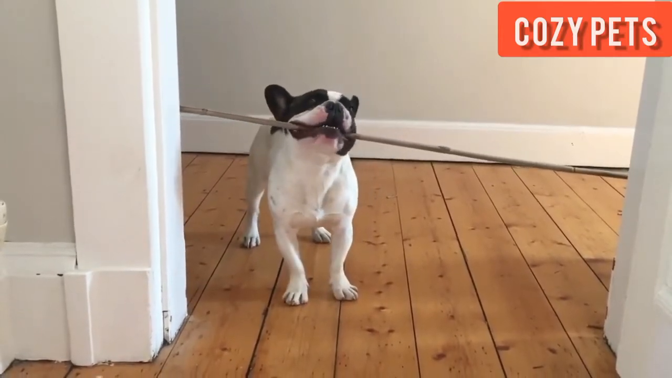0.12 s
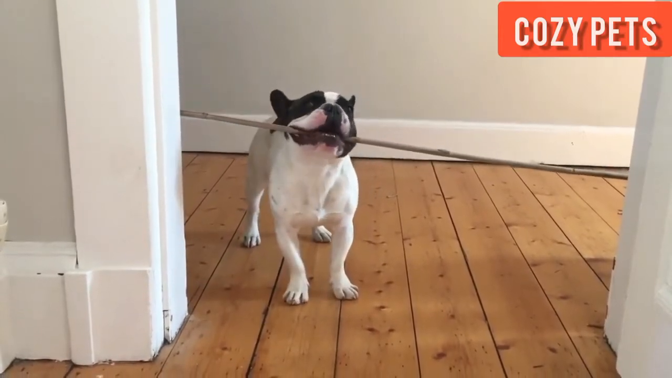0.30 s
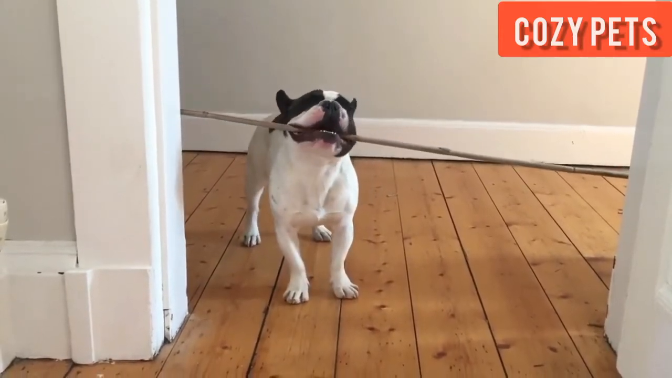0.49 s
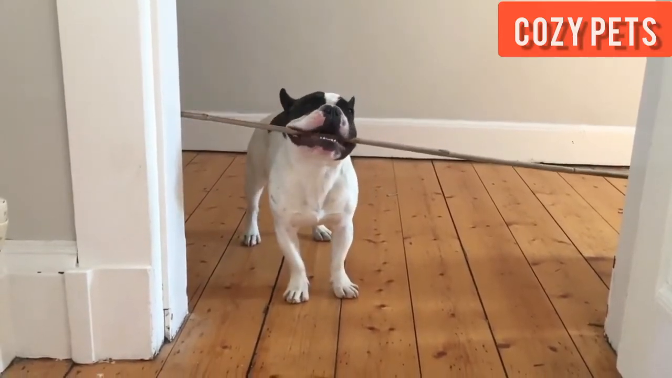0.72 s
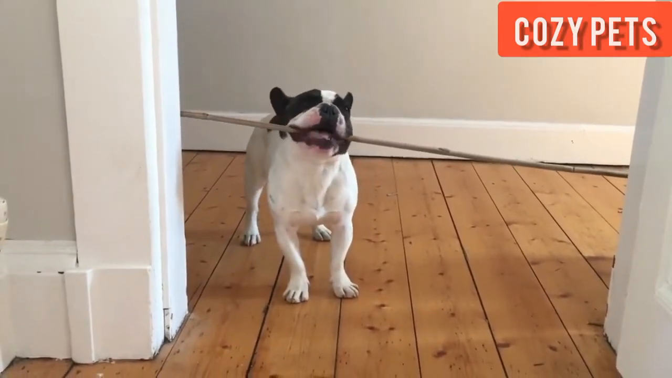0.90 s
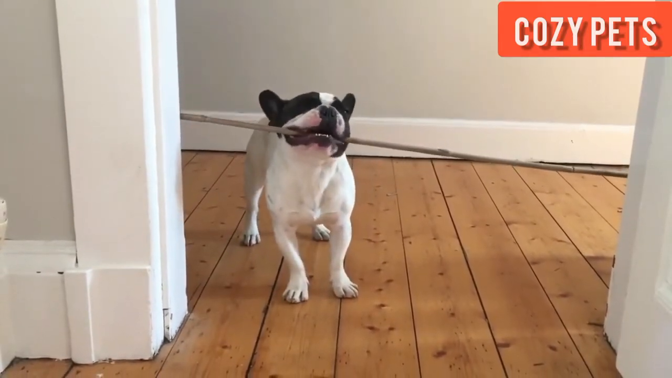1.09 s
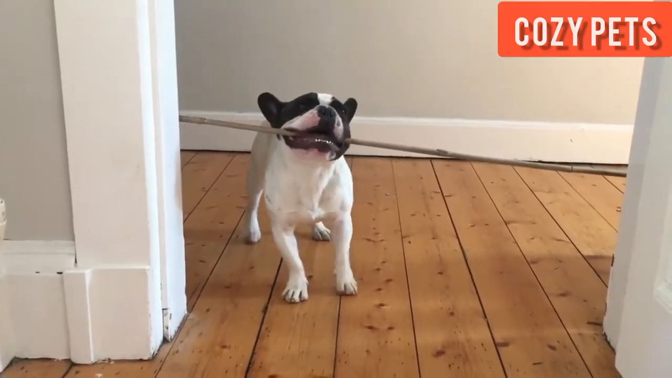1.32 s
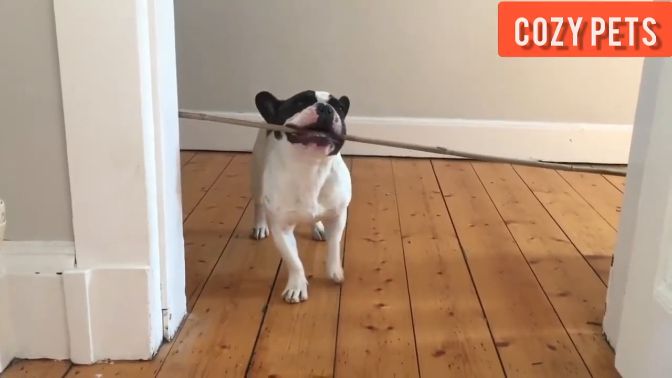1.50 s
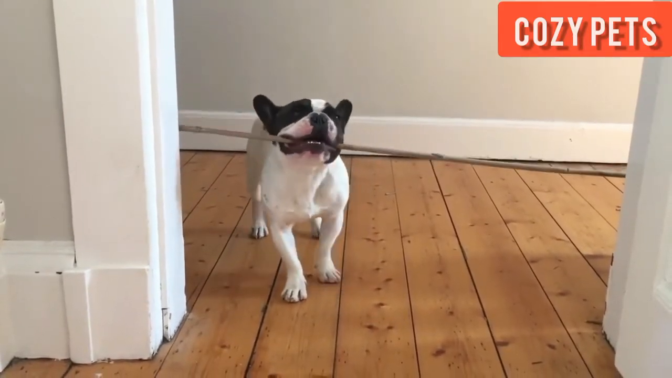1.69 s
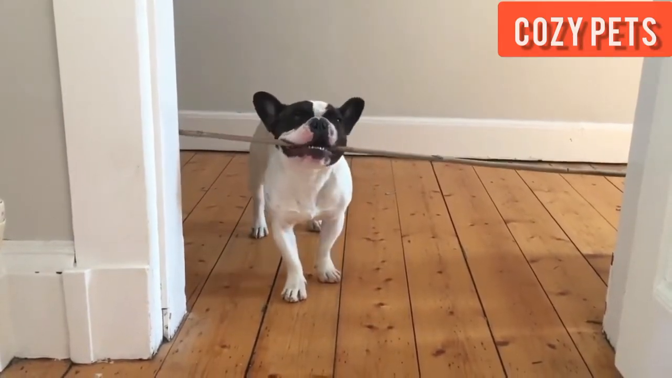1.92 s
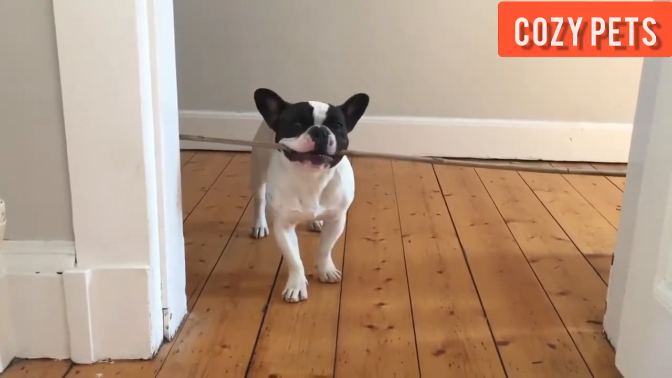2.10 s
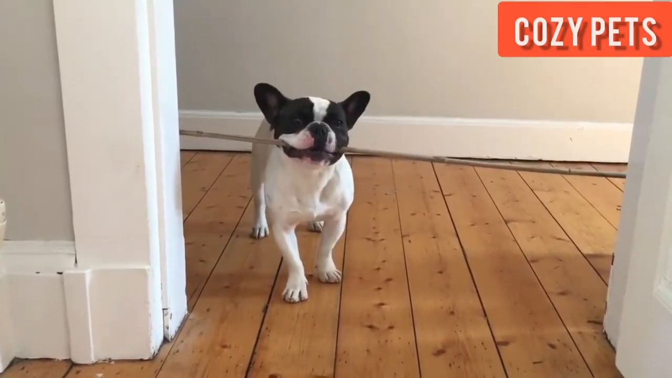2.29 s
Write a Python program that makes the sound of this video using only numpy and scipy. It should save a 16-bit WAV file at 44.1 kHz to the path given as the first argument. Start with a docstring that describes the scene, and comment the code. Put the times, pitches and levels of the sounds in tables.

```python
"""A bare room with a board floor: a small dog tries to carry a long stick through a doorway.
The stick's ends rub and knock on the wooden frame in three flurries: grainy noise bursts for the bark,
decaying sines for the ringing stick and frame. Bumps add low notes, paws fall softly, dry rasps fill the gaps.
Decaying noise makes the room's answer; beneath lie a low rumble, faint hiss and, late on, a faint low note."""
import sys
import numpy as np
from scipy import signal
from scipy.io import wavfile
from scipy.ndimage import uniform_filter1d

SR = 44100
rng = np.random.default_rng(int(sys.argv[2]) if len(sys.argv) > 2 else 0)


def int16_out(signal):
    """Quantize to a 16-bit WAV file."""
    q = np.round(np.clip(np.atleast_2d(signal).T, -1, 1) * 32767)
    wavfile.write(sys.argv[1], SR, q.astype(np.int16))


N = 103635
T = np.arange(N) / SR


def from_db(db):
    """Decibels to amplitude gain."""
    return 10 ** (np.asarray(db) / 20)


def rms_one(x):
    """Scale to rms 1."""
    return x / np.sqrt(np.mean(x ** 2) + 1e-20)


def at_hz(points, hz):
    """Interpolate a two-column table on a log-frequency axis."""
    points = np.array(points)
    return np.interp(np.log(hz), np.log(points[:, 0]), points[:, 1])


def filtered(x, order, cutoff_hz, kind):
    """Butterworth filter."""
    return signal.sosfilt(signal.butter(order, cutoff_hz, kind, fs=SR, output="sos"), x)


def narrow_noise(hz, width_hz):
    """Noise in one resonance, rms 1; the first second settles the filter and is dropped."""
    band_hz = [hz - width_hz / 2, hz + width_hz / 2]
    return rms_one(filtered(rng.standard_normal(N + SR), 2, band_hz, "band")[SR:])


def flicker(per_s, spread_db):
    """Random gain, rms 1: a new target per_s times a second, straight lines between."""
    targets = rng.standard_normal(2000)
    return rms_one(from_db(spread_db * np.interp(T * per_s, np.arange(2000), targets)))


def mid_side(mid, side):
    """Stereo from the sum and difference parts."""
    return mid + side * np.array([[1], [-1]])


# stereo width: freq_hz, side_re_mid_db
WIDTH = [(100, -21), (600, -22), (1300, -34), (2800, -39), (4500, -16), (15000, -7)]
BAND_EDGES_HZ = np.geomspace(110, 17000, 31)


def banded(gain_at, side_db=0):
    """Stereo noise in 30 log-spaced bands; gain_at(hz) gives each band's gain or envelope."""
    out = 0
    white = rng.standard_normal((3, 2, N))  # neighbouring bands get different noise
    for k, (low_hz, high_hz) in enumerate(zip(BAND_EDGES_HZ, BAND_EDGES_HZ[1:])):
        hz = np.sqrt(low_hz * high_hz)
        mid, side = white[k % len(white)]
        noise = mid_side(mid, from_db(at_hz(WIDTH, hz) + side_db) * side)
        out = out + filtered(noise * gain_at(hz) + 1e-18, 3, [low_hz, high_hz], "band")
    return out


def ring(times_s, levels_db, hz, t60_s):
    """One mode as a two-pole resonator, struck at the given times."""
    clicks = np.zeros(N)
    np.add.at(clicks, (times_s * SR).astype(int), from_db(levels_db))
    r = from_db(-60 / (t60_s * SR))
    w = 2 * np.pi * hz / SR
    return signal.lfilter([0, np.sin(w)], [1, -2 * r * np.cos(w), r * r], clicks + 1e-18)


def soft_hits(rows, modes, swell_s):
    """Under a soft contact the modes swell before they die: slow decay minus fast decay."""
    times_s, level_db = np.transpose(rows)
    swell_t60_s = swell_s * np.log(1000)
    out = 0
    for hz, mode_db, t60_s in modes:
        slow = ring(times_s, level_db + mode_db, hz, t60_s)
        fast = ring(times_s, level_db + mode_db, hz, swell_t60_s)
        out = out + slow - fast
    return out


# room's lowest resonances: freq_hz, width_hz, relative_level_db
RUMBLE_MODES = [(58.4, 17, 7), (88.4, 27, 0), (143, 50, -18.5)]
# rumble level over time: time_s, level_db
RUMBLE_LEVEL = [(0.0, -70), (.23, -54), (.27, -65), (.38, -47), (.63, -64), (.76, -54.5), (1.11, -67.5),
                (1.26, -52), (1.31, -74), (1.35, -54), (1.64, -56), (1.99, -52), (2.07, -69.5),
                (2.3, -56.5)]
RUMBLE_SIDE_DB = -39


def rumble():
    """Noise in the room's lowest resonances, evened out, then made to waver by the level table."""
    mid, side = (sum(from_db(db) * narrow_noise(hz, width_hz) for hz, width_hz, db in RUMBLE_MODES)
                 for _ in range(2))
    even_mid = mid / np.sqrt(uniform_filter1d(mid ** 2, size=2200) + 1e-9)  # 50 ms window
    level_db = np.interp(T, *np.transpose(RUMBLE_LEVEL))
    return from_db(level_db) * mid_side(even_mid, from_db(RUMBLE_SIDE_DB) * rms_one(side))


# hiss spectrum: freq_hz, relative_density_db
HISS_SPECTRUM = [(120, -3.5), (300, 4.5), (550, -8.5), (1600, -10.5), (5500, -16), (15500, -24)]
HISS_DB = -71


def hiss():
    """Faint steady noise, weaker toward the treble."""
    return from_db(HISS_DB) * rms_one(banded(lambda hz: from_db(at_hz(HISS_SPECTRUM, hz))))


# faint low note: freq_hz, width_hz, middle_s, half_length_s, level_db
LOW_NOTE = (352, 70, 2.0, .26, -65)


def low_note():
    """Narrow-band noise that swells and fades under the last flurry."""
    hz, width_hz, middle_s, half_length_s, db = LOW_NOTE
    swell = np.exp(-np.square(np.square((T - middle_s) / half_length_s)))
    return from_db(db) * swell * narrow_noise(hz, width_hz)


# room reverberation: freq_hz, t60_s, level_db
ROOM = [(144, .3, -2), (300, 0.52, -11), (740, .44, -4), (1750, .5, -6), (2650, .47, -6), (5500, .42, -7),
        (8900, .33, -7), (15000, .2, -10)]
ROOM_SIDE_DB = -18  # added to WIDTH


def room(x):
    """Diffuse reflections as banded noise tails: quick build-up, decay time set by frequency."""
    table = np.array(ROOM)
    build_up = np.clip((T - .004) / .006, 0, 1)

    def tail(hz):
        decay = build_up * from_db(-60 * T / at_hz(table[:, :2], hz))
        level = from_db(at_hz(table[:, ::2], hz))
        return level * decay / np.sqrt(np.sum(decay ** 2))

    mono = x.mean(axis=0)[None]
    return signal.fftconvolve(mono, banded(tail, ROOM_SIDE_DB), axes=1)[:, :N]


SCATTER_ABOVE_HZ, SCATTER_WIDTH_HZ = 2200, 450


def scatter(x):
    """Wood radiates treble unevenly by direction; random frequency shifts blur the reflections' peaks."""
    low = filtered(x, 4, SCATTER_ABOVE_HZ, "low")
    high = filtered(x, 4, SCATTER_ABOVE_HZ, "high")
    wander = np.interp(T * SCATTER_WIDTH_HZ, np.arange(N), rng.standard_normal(N))
    shift_hz = SCATTER_WIDTH_HZ * rms_one(wander)
    turn = np.exp(2j * np.pi * np.cumsum(shift_hz) / SR)
    return low + np.real(signal.hilbert(high) * turn)


# soft paw falls: start_s, level_db
PAW_FALLS = [(.715, -46.5), (1.19, -56), (1.545, -45), (2.225, -46.5)]
# floor board modes: freq_hz, relative_level_db, t60_s
BOARD_MODES = [(76.6, -0.5, 0.32), (92, 5.5, 0.1)]


def paw_falls():
    """Soft paws excite the low modes of the floor boards."""
    return soft_hits(PAW_FALLS, BOARD_MODES, swell_s=0.0083)


# small dry rasps between the flurries: start_s, level_db, low_hz, high_hz
RASPS = [(.902, -53.5, 1672, 4740), (0.907, -52, 1700, 4370), (1.576, -46.5, 1260, 3550),
         (1.734, -48.5, 856, 1873)]
RASP_ATTACK_S, RASP_DECAY_S = 0.0039, 0.0078
GRAINS_PER_S, RUB_GRAIN_DB = 340, 3


def rasps():
    """The stick shifts a little: brief band-passed noise with a grainy gain."""
    out = 0
    for start_s, db, low_hz, high_hz in RASPS:
        attack = np.clip((T - start_s) / RASP_ATTACK_S, 0, 1)
        decay = np.exp(-np.clip((T - start_s) / RASP_DECAY_S, 0, 40))
        noise = rms_one(filtered(rng.standard_normal(N), 4, [low_hz, high_hz], "band"))
        out = out + from_db(db) * attack * decay * noise
    return out * flicker(GRAINS_PER_S, RUB_GRAIN_DB)


# bumps on stick and frame: start_s, level_db, flex_pitch_hz, time_to_peak_s
BUMPS = [(.045, -53, 262, 0.013), (0.25, -41, 276, 0.017), (.308, -30, 273.4, .015),
         (.668, -44.5, 275, .011), (1.132, -49, 277.7, 0.027), (1.217, -51, 300, 0.014),
         (1.271, -36, 282.5, 0.015), (1.318, -42.5, 301.6, 0.014), (1.761, -57, 333, .028),
         (1.825, -34.5, 283, 0.018), (1.899, -34.5, 304, 0.0094)]
# frame's low modes: freq_hz, relative_level_db, t60_s
LOW_MODES = [(428, -13.5, 0.13), (664, -16.5, .15)]
FLEX_SHARPNESS = 4.9  # exponent on the swell shape


def bumps():
    """The stick flexes in a short low note, damped by the dog's jaws, and stirs the frame's low modes."""
    out = soft_hits([row[:2] for row in BUMPS], LOW_MODES, swell_s=.004)
    for start_s, db, hz, peak_s in BUMPS:
        age = np.clip((T - start_s) / peak_s, 0, 20)
        swell = (age * np.exp(1 - age)) ** FLEX_SHARPNESS
        out = out + from_db(db) * swell * np.sin(2 * np.pi * hz * (T - start_s))
    return out


# frequencies of the four contact levels in RUBS and KNOCKS: freq_hz
CONTACT_HZ = (700, 2000, 5000, 12000)


def force_db(rows, hz):
    """Strength of each contact at one frequency."""
    levels_db = [row[2:][:len(CONTACT_HZ)] for row in rows]
    return np.array([np.interp(np.log(hz), np.log(CONTACT_HZ), row_db) for row_db in levels_db])


# colour of the wood under a contact: freq_hz, gain_db
WOOD = [(150, -5.5), (400, -6.5), (850, -4), (1300, 0), (1650, -0.5), (2150, -6), (2800, 6), (3400, -1),
        (4400, -0.5), (5800, 4), (8000, -2), (11000, -1), (15000, -2)]
PATCHES_PER_S = 90


def contacts(rows, attack_s, release_s, grain_db, patchy_db):
    """Rough bark: grainy bursts of tiny slips, each band flickering as the contact point moves."""
    shapes = []
    for start_s, length_s, *_ in rows:
        attack = np.clip((T - start_s) / attack_s, 0, 1)
        release = np.exp(-np.clip((T - start_s - length_s) / release_s, 0, 40))
        shapes.append(attack * release)
    shapes = np.array(shapes)
    grain = flicker(GRAINS_PER_S, grain_db)

    def envelope(hz):
        strength = from_db(force_db(rows, hz) + at_hz(WOOD, hz))
        return grain * flicker(PATCHES_PER_S, patchy_db) * (strength @ shapes)

    return banded(envelope)


# stick modes: freq_hz, relative_level_db, t60_s
STICK_MODES = [(1555, 1, .045), (1180, -7, .04), (2620, -7, .025), (3493, -1, .032), (4300, -3.5, .022),
               (5195, 0, .028), (5650, -2, .022), (6150, -4, .022), (6740, -2, .03), (8750, -3, .025)]
STRIKE_SPREAD_DB = 1.5


def stick_ring(times_s, strength_db, detune):
    """Decaying sines, shifted in pitch and level per blow; strength_db(hz) gives each blow's level."""
    out = np.zeros(N + SR)
    age_s = T[:SR // 10]
    starts = (times_s * SR).astype(int)
    for hz, mode_db, t60_s in STICK_MODES:
        chance = rng.standard_normal((200, 2))
        for start, blow_db, (shift, spread) in zip(starts, strength_db(hz), chance):
            level_db = blow_db + mode_db + STRIKE_SPREAD_DB * spread - 60 * age_s / t60_s
            tone = np.sin(2 * np.pi * hz * (1 + detune * shift) * age_s)
            out[start:start + len(age_s)] += from_db(level_db) * tone
    return out[:N]


# stick tip rubbing along the frame: start_s, length_s, then level_db at each of the four CONTACT_HZ
RUBS = [(.040, 0.0097, -47, -47, -81, -80), (.17, 0.039, -54, -62, -59.5, -65),
        (.201, .026, -49, -51, -51.5, -55), (.231, .012, -36.5, -36, -41, -44),
        (.252, 0.053, -62, -51, -36.5, -48), (.660, 0.018, -38, -55.5, -76, -78),
        (.727, .022, -59.5, -63, -58.5, -82.5), (1.18, 0.034, -52.5, -57, -48, -50),
        (1.24, 0.023, -37, -49, -41, -43), (1.275, 0.063, -31.5, -58, -51, -64),
        (1.828, 0.026, -29, -35.5, -54, -66), (1.857, .06, -27.5, -27, -45.5, -50),
        (1.884, 0.052, -59, -59, -33, -40.5), (1.925, 0.044, -43, -47, -38.5, -41)]


def scrapes():
    """The tip rubs along the frame: longer, patchy bark noise."""
    return contacts(RUBS, attack_s=0.014, release_s=.0077, grain_db=RUB_GRAIN_DB, patchy_db=4)


SNAGS_PER_S, SNAG_DB, SNAG_SPREAD_DB = 110, -15, 3  # levels relative to the rub


def snags():
    """The rubbing tip catches at uneven moments, which sets the stick ringing."""
    draws = rng.random((len(RUBS), 40))
    catches = []
    for k, (start_s, length_s, *_) in enumerate(RUBS):
        for i in range(min(int(length_s * SNAGS_PER_S), draws.shape[1])):
            catches.append((k, start_s + (i + draws[k, i]) / SNAGS_PER_S))
    which, times_s = np.transpose(catches)
    which = which.astype(int)
    size_db = SNAG_DB + SNAG_SPREAD_DB * rng.standard_normal(len(times_s))
    return stick_ring(times_s, lambda hz: force_db(RUBS, hz)[which] + size_db, detune=.05)


# knocks of the stick: start_s, length_s, level_db at each of the four CONTACT_HZ,
# frame_ring_db, stick_ring_db
KNOCKS = [(0.164, 0.0012, -50, -83, -45.5, -54, -70.5, -68.5),
          (0.2457, .0028, -22.5, -20, -20.5, -17.5, -44, -55),
          (0.3033, .0016, -19, -10, -31, -23, -39.5, -22), (0.3056, 0.0012, -8, -19, -5, -22, -16.5, -33),
          (0.3106, 0.00096, -16.5, -9, -17.5, -15, -35.5, -47),
          (1.165, .0025, -58.5, -61, -51.5, -62, -79.5, -64.5),
          (1.191, .0022, -58, -49, -29.5, -46, -64.5, -64.5),
          (1.2181, 0.0063, -44.5, -32, -32.5, -37.5, -47, -46),
          (1.2665, 0.0029, -50.5, -31, -15.5, -29, -48, -46.5),
          (1.273, 0.0019, -48.5, -32.5, -23, -25, -40, -56),
          (1.2985, 0.006, -55, -21.5, -23, -29.5, -74, -42),
          (1.8257, 0.0044, -24, -35.5, -43.5, -50, -59.5, -54.5),
          (1.8635, 0.0062, -22, -19, -44.5, -57, -42, -45.5),
          (1.876, 0.005, -22.5, -38.5, -34.5, -46, -67, -52),
          (1.886, 0.0057, -33, -42, -30, -33, -65.5, -63), (1.9112, 0.01, -36, -39.5, -28.5, -34, -60, -43),
          (1.934, 0.0013, -45, -45, -24, -39, -58, -47), (1.952, 0.00082, -46.5, -33, -24, -31, -61, -44),
          (1.982, 0.002, -51.5, -64, -33, -39, -57, -53),
          (2.0518, 0.00099, -68, -61.5, -38.5, -46.5, -68, -52.5),
          (2.0862, 0.0033, -63, -28.5, -20.5, -25, -46, -31.5)]
KNOCK_ATTACK_S = .0005


def cracks():
    """The stick knocks on the frame: short, sharp bark noise."""
    return contacts(KNOCKS, KNOCK_ATTACK_S, release_s=.0022, grain_db=1.5, patchy_db=1.5)


# frame modes: freq_hz, relative_level_db, t60_s
FRAME_MODES = [(1510, -5, 0.097), (1640, -19, 0.35), (1725, 6, 0.052), (1961, -3.5, .07),
               (2090, -6.5, 0.035), (2607, 8, 0.014), (2894, -1.5, 0.12)]


def knock_rings():
    """Each knock sets frame and stick ringing; the frame's modes alternate in sign."""
    times_s, *_, frame_db, stick_db = np.transpose(KNOCKS)
    times_s = times_s + KNOCK_ATTACK_S
    frame = 0
    for k, (hz, mode_db, t60_s) in enumerate(FRAME_MODES):
        frame = frame + (-1) ** k * ring(times_s, frame_db + mode_db, hz, t60_s)
    return frame + stick_ring(times_s, lambda hz: stick_db, detune=.008)


RING_LOW_CUT_HZ = 1400  # narrow pieces of wood radiate little bass
RING_ROOM_DB = -6


def scene():
    """Background, paws, stick and frame; cracks and scrapes feed the room more than the rings do."""
    background = rumble() + hiss() + low_note()
    wood = cracks() + scrapes() + rasps() + bumps()
    rings = filtered(knock_rings() + snags(), 2, RING_LOW_CUT_HZ, "high")
    reflections = scatter(room(wood + from_db(RING_ROOM_DB) * rings))
    return background + paw_falls() + reflections + wood + rings


PEAK_LIMIT, CUTOFF_HZ = .8, 15900


def record(dry):
    """Round the loudest peaks, then cut the top steeply."""
    rounded = PEAK_LIMIT * np.tanh(dry / PEAK_LIMIT)
    low_pass = signal.ellip(10, .2, 80, CUTOFF_HZ, fs=SR, output="sos")  # ripple dB, stop-band dB
    return signal.sosfilt(low_pass, rounded)


dry = scene()
out = record(dry)
int16_out(out)
```